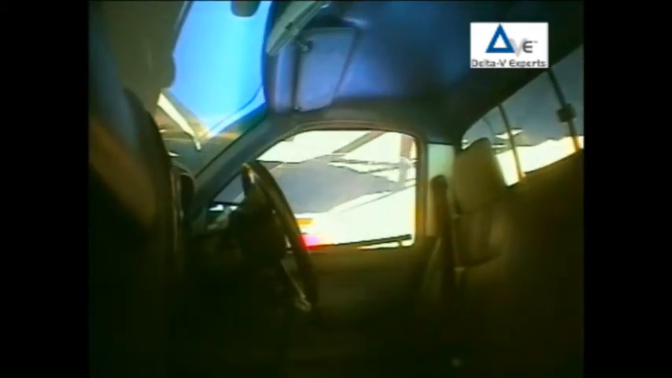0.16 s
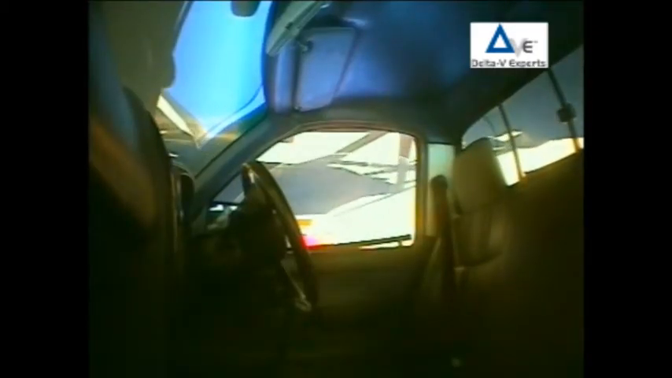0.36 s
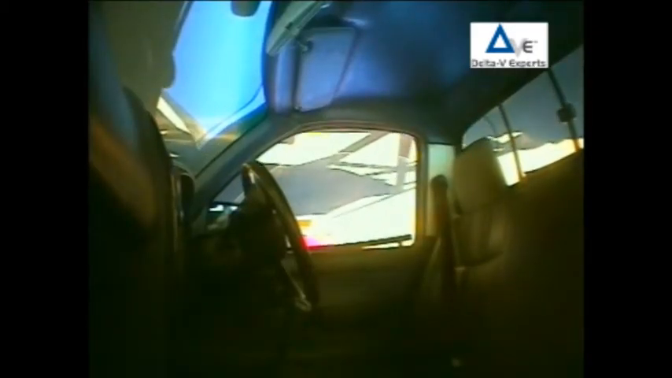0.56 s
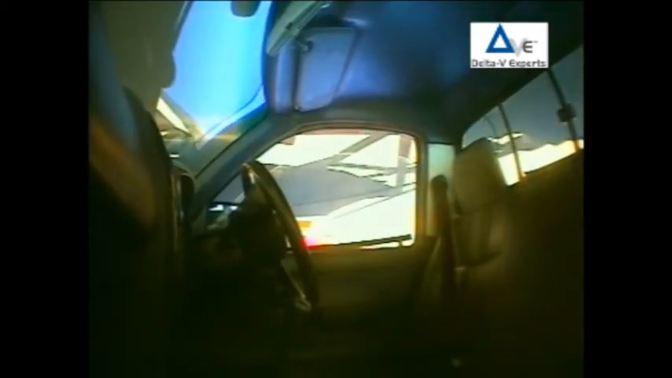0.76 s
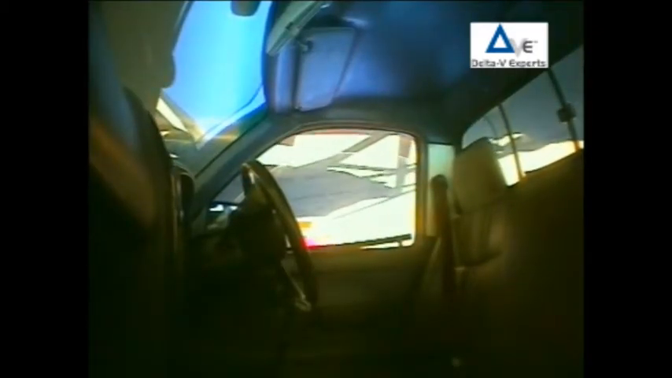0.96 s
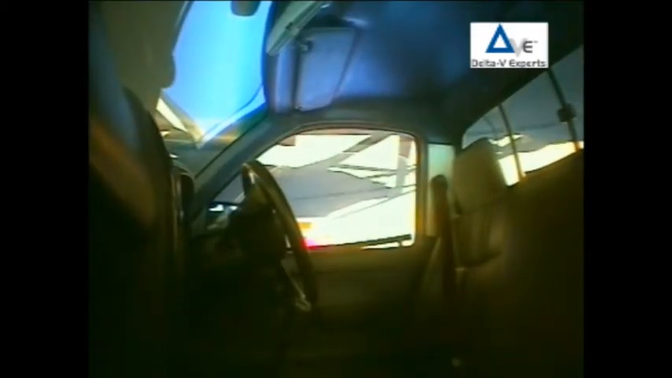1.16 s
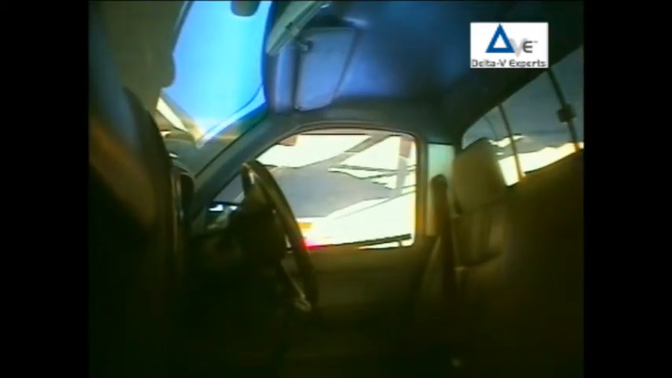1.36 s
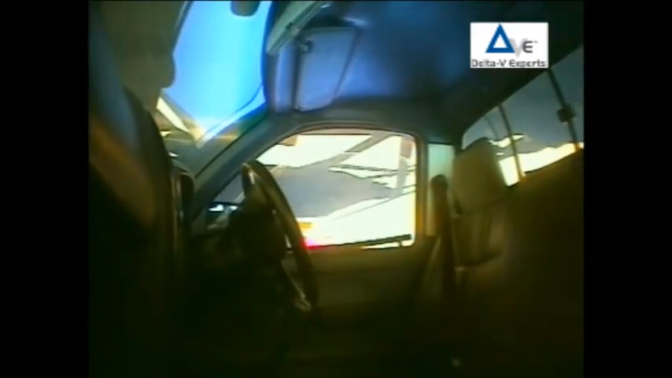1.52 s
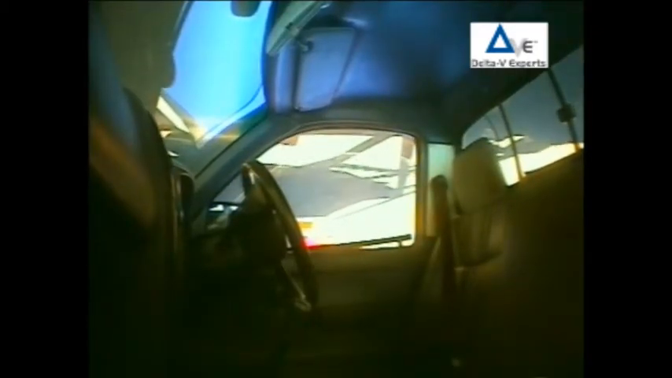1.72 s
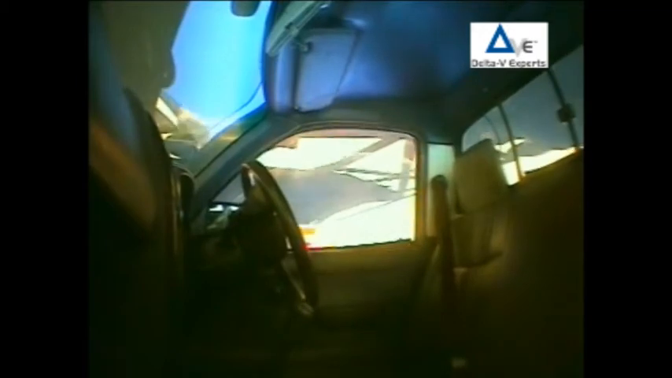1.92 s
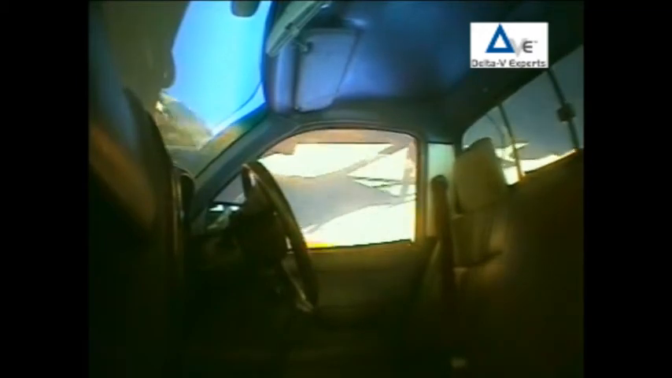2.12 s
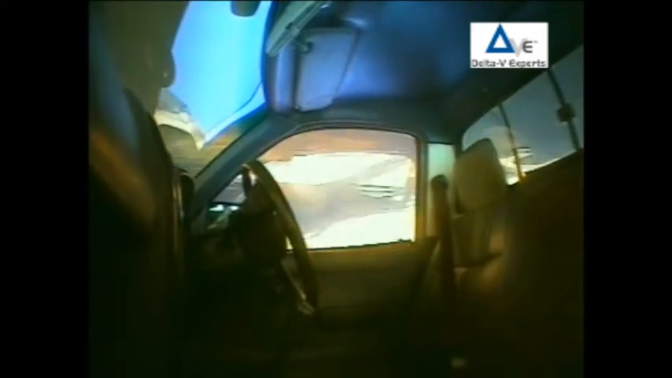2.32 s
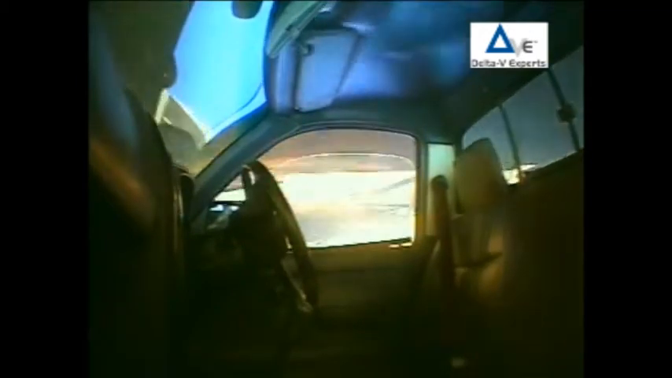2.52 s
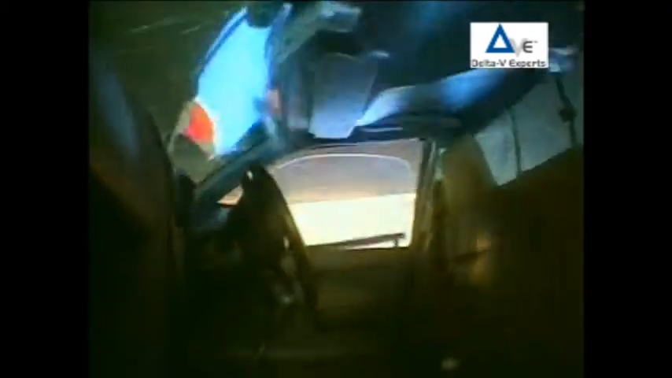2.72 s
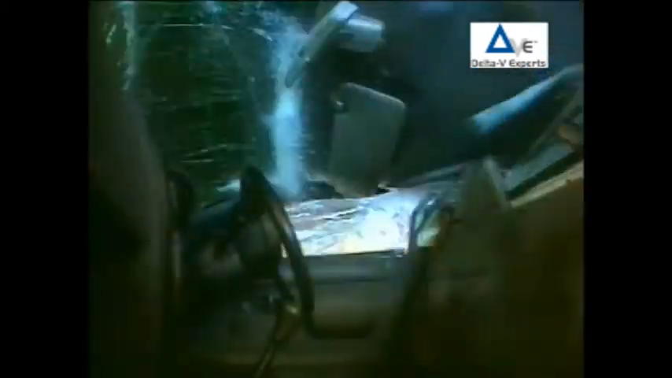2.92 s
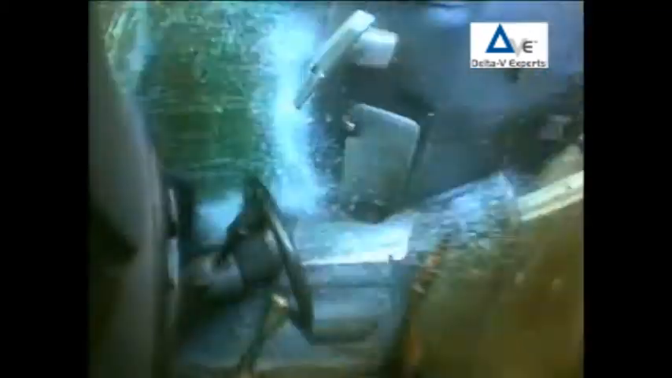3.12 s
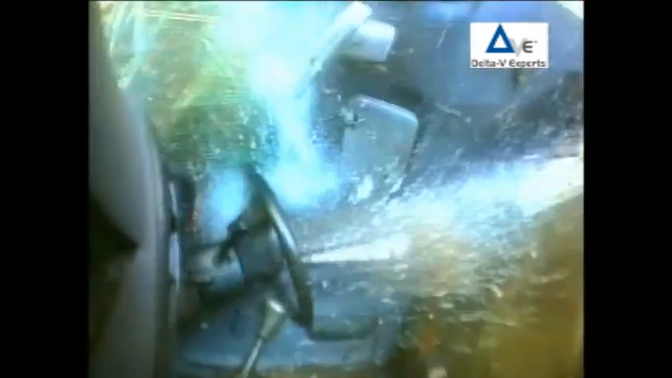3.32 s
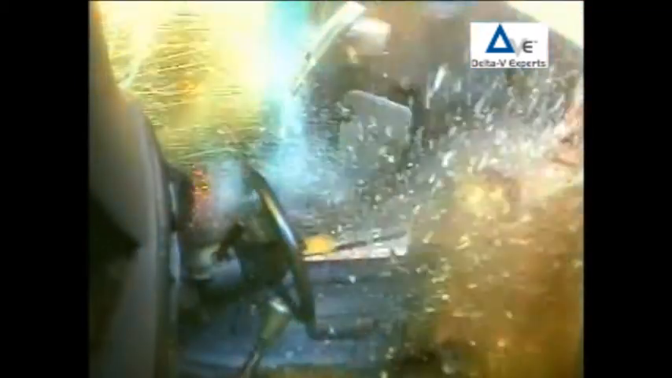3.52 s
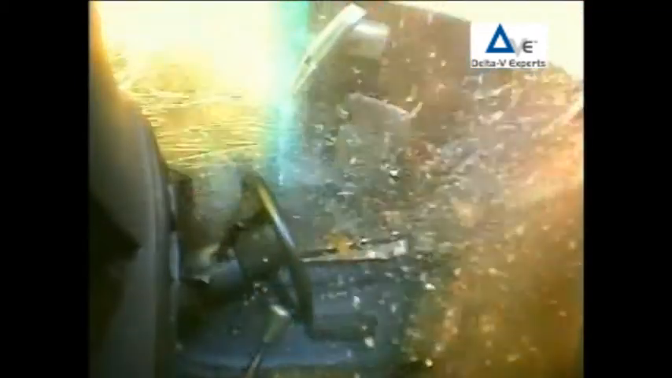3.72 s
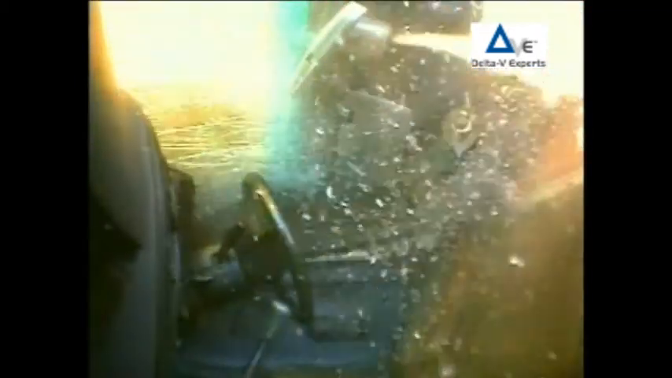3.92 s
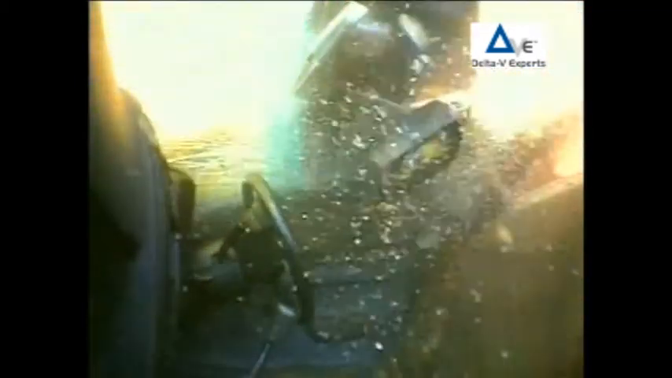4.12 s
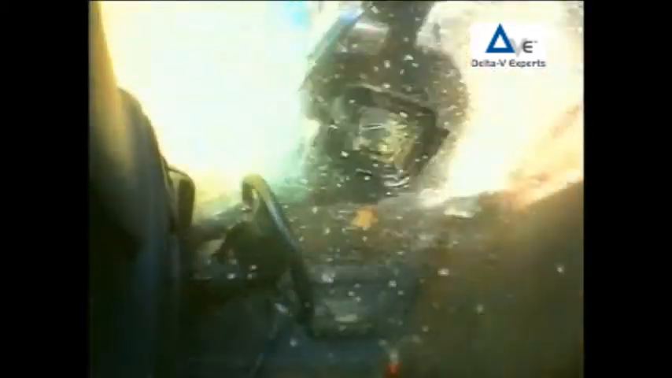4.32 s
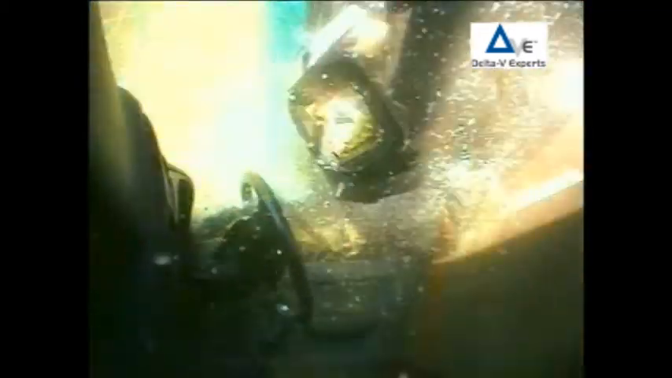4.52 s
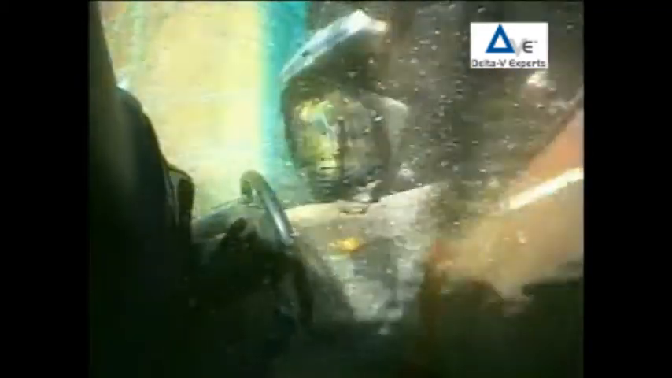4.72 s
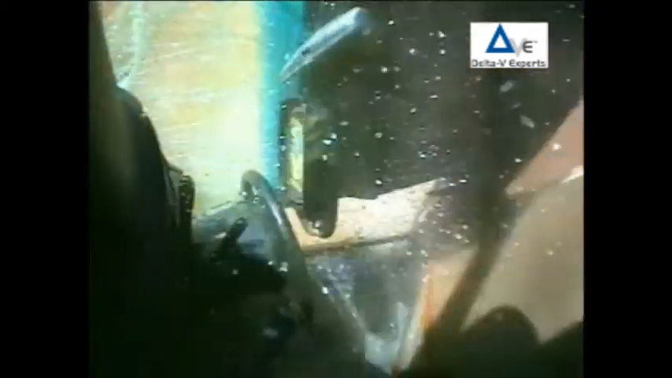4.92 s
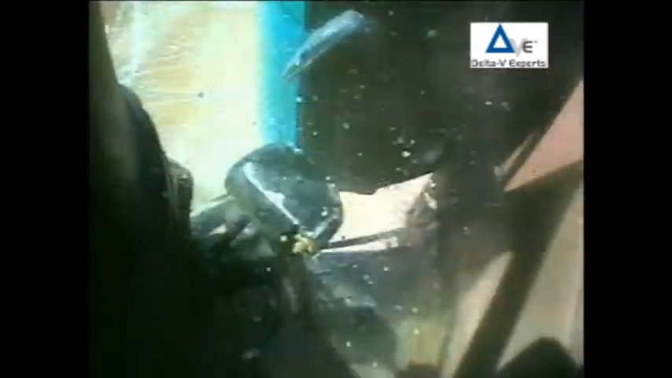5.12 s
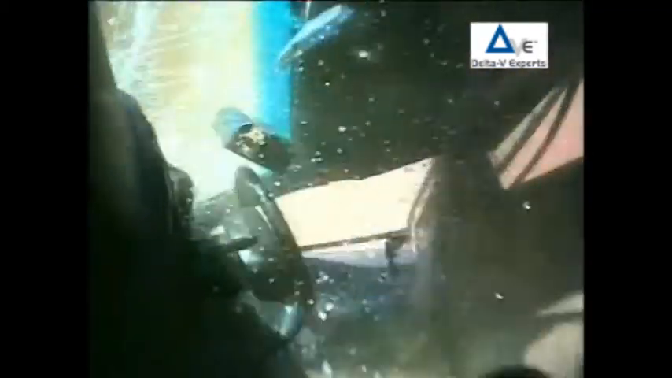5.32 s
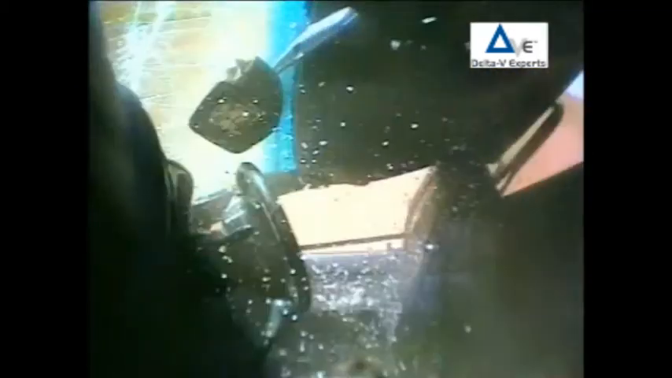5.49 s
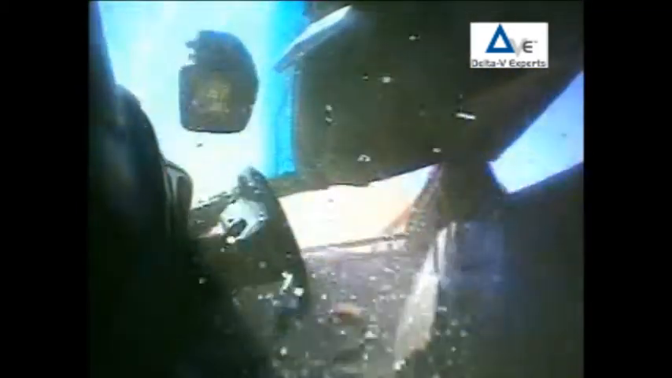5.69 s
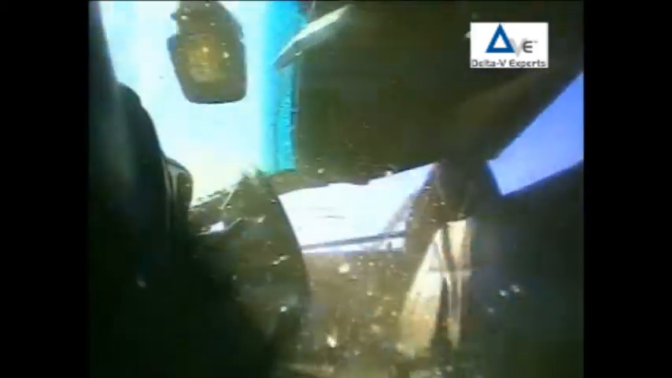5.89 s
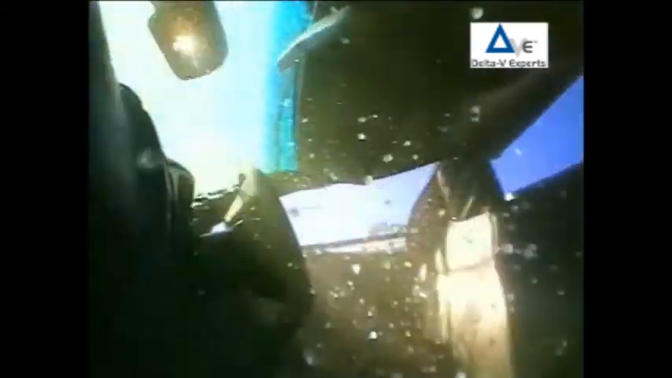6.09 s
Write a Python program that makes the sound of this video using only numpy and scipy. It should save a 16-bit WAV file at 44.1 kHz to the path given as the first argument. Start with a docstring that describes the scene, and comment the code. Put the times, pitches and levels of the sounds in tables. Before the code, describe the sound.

From inside a truck cab there is only faint hum, hiss and a soft electrical buzz pulsing on the right. A low shudder marks the release, a brief lull follows, then heavy blows, crumpling metal and breaking glass roar through two overlapping roof crushes. Panels groan and squeal. The rolling shell rumbles on, debris clatters, and a few dull knocks end it. The cheap, muffled microphone sits on the left.

```python
"""A pickup truck drops onto its roof and rolls, heard dull and deep from inside the cab.
Random snaps through dull, resonant panels make the two roof crushes, breaking glass and rumbling shell.
A shudder as the rig lets go, blows, knocks, squeals and debris join in over a faint hum, rumble and hiss.
The microphone feeds the left side of an 8-bit recorder; the idle right side carries little but hiss,
whine and a pulsing electrical buzz."""
import sys
import numpy as np
from scipy import signal
from scipy.fft import rfft, irfft, next_fast_len
from scipy.io import wavfile
from scipy.ndimage import uniform_filter1d

SR = 44100
rng = np.random.default_rng(int(sys.argv[2]) if len(sys.argv) > 2 else 0)


def wav_record(signal):
    """Record a signal, one row per channel, as 16-bit PCM in the file named by sys.argv[1]."""
    frames = np.transpose(np.atleast_2d(signal))
    bounded = np.clip(frames, -1, 1)
    # unit amplitude maps onto the largest positive 16-bit level
    quanta = np.round(bounded * 32767).astype(np.int16)
    wavfile.write(sys.argv[1], SR, quanta)


N = 271207

# Levels of the truck's sounds are relative: CAB_GAIN_DB is added to their sum.
# Soft cab rumble as the rig starts to roll. Each row: time in seconds, level in dB.
RIG_RUMBLE_LEVELS = [(0, -63.5), (.95, -59.5), (1.08, -55), (1.4, -55), (2.2, -55.5)]
# The hum sinks once the rig rolls. Each row: time in seconds, change in dB.
HUM_FADE = [(1.0, 0), (1.12, -5)]
# Steady whine on the idle side. Each row: multiple of WHINE_HZ, peak in dB.
WHINE_PARTIALS = [(1, -81), (2, -96), (3, -90.5), (4, -96), (5, -96)]
# Spells of pulsing buzz on the idle side. Each row: first burst in seconds, end in seconds.
BUZZ_SPELLS = [(0.128, 1.28), (1.789, 5.24), (5.934, 6.06)]
# Spectrum of the shudder. Each row: frequency in Hz, relative density in dB per Hz.
SHUDDER_SPECTRUM = [(13, -31.5), (22, -2.5), (44, -0.5), (103, -8.5), (136, -3.5), (249, -20), (280, -29.5),
                    (360, -24.5), (404, -37), (432, -32.5), (1200, -50.5), (1560, -65), (2640, -120)]
# Spectrum of snaps heard through the cab. Each row: frequency in Hz, relative density in dB per Hz.
CAB_SPECTRUM = [(13, -38.5), (22, -6), (43, -3), (135, -0.5), (225, -6.5), (273, -9.5), (352, -7),
                (551, -4), (626, -8.5), (697, -7), (959, -15.5), (1110, -13.5), (1500, -20.5),
                (2070, -27.5), (3600, -51), (4680, -75.5), (7920, -120)]
# Panel resonances. Each row: frequency in Hz, width in Hz, relative gain in dB.
PANEL_RESONANCES = [(128.8, 27, -3), (153.8, 22, -3.5), (221.4, 29, -6), (401.6, 31, -12), (583, 50, -3.5),
                    (700, 50, -10), (893, 60, -4.5), (1093, 80, -9.5), (1798, 70, -8.5), (2232, 48, -4)]
# Showers of debris and loose trim on the panels.
# Each row: peak in seconds, rise in seconds, fall in seconds, metal in dB, glass in dB.
DEBRIS_SHOWERS = [(1.44, 0.016, 0.036, -58, -71), (4.825, 0.057, 0.029, -36.5, -52.5),
                  (4.931, 0.034, .027, -36.5, -43), (5.053, 0.04, 0.053, -41.5, -45.5),
                  (5.183, 0.022, 0.04, -46, -57), (5.461, 0.019, 0.035, -56.5, -70),
                  (5.896, 0.024, 0.067, -47, -67.5)]
# Snapping panes. Each row: time in seconds, click height in dB before its band-pass.
GLASS_CRACKS = [(3.543, -22), (3.811, -28), (3.835, -21)]
# Bounces of the shell and loose parts. Each row: start in seconds, pitch in Hz, swell peak in dB.
BOUNCES = [(1.433, 129.3, -33), (1.484, 49.8, -37), (1.486, 138, -36), (1.528, 185.5, -41),
           (1.555, 60.3, -39), (1.634, 46, -42.5), (1.685, 108.4, -45.5), (2.576, 55.4, -34),
           (2.704, 146.6, -24.5), (2.85, 99, -26.5), (3.06, 46, -23.5), (3.243, 149, -28),
           (3.525, 214, -22.5), (3.679, 88, -22.5), (3.781, 210.4, -21.5), (3.873, 151, -27.5),
           (4.047, 220, -25.5), (4.108, 130, -31), (4.327, 214, -25.5), (4.468, 116.6, -23),
           (4.751, 235, -27), (4.806, 233, -33), (4.849, 288, -35), (4.985, 75.5, -32.5),
           (5.04, 182.5, -35.5), (5.153, 173, -27), (5.188, 48, -30.5), (5.271, 119.5, -30.5),
           (5.276, 52.5, -31), (5.435, 101.8, -31), (5.445, 351, -46), (5.534, 75.8, -33),
           (5.61, 120.3, -30), (5.868, 315.5, -46), (5.886, 102, -30.5), (5.92, 376, -48)]
# Blows on the shell. Each row: start in seconds, relative strength in dB, contact in seconds.
SHELL_BLOWS = [(1.419, -37, 0.0022), (1.434, -25, 0.0037), (1.45, -30, 0.0041), (1.47, -38.5, .0018),
               (1.485, -29, 0.0075), (2.224, -28.5, .0047), (2.245, -17, 0.0024), (2.257, -21, 0.0015),
               (2.264, -19, 0.0015), (2.449, -22, .0013), (2.466, -22, 0.0015), (2.485, -18, 0.0014),
               (2.524, -19, 0.0018), (2.668, -16.5, 0.0014), (2.674, -17, 0.0024), (2.698, -22, 0.0055),
               (2.732, -17.5, 0.0021), (2.799, -23.5, 0.0014), (2.826, -17.5, 0.0031),
               (2.837, -18.5, 0.0021), (2.861, -12, 0.0022), (2.881, -22, .003), (2.911, -17, .002),
               (2.926, -23.5, 0.0018), (3.26, -23, 0.0029), (3.378, -19.5, 0.0011), (3.491, -13, 0.0015),
               (3.52, -17, .0021), (3.543, -12, 0.0016), (3.633, -19, 0.0014), (3.643, -13.5, .0023),
               (3.703, -12.5, 0.0089), (3.738, -17.5, 0.0017), (3.769, -17.5, 0.0026), (3.781, -11, 0.0023),
               (3.797, -18, .0026), (3.809, -11, .0024), (3.816, -19, 0.0017), (3.834, -15, 0.0017),
               (3.859, -17.5, 0.0024), (3.88, -16.5, 0.0013), (3.893, -10.5, 0.0027), (4.11, -20.5, 0.0014),
               (4.122, -17, .0017), (4.339, -23, 0.0023), (4.398, -18, 0.0032), (4.432, -18, 0.0017),
               (4.448, -15.5, 0.0019), (4.475, -19, 0.0035), (4.483, -6.5, 0.0031), (4.57, -13, 0.0043),
               (4.59, -10, 0.0024), (4.617, -24.5, 0.00097), (4.642, -13, 0.0071), (4.654, -16, 0.0041),
               (4.693, -13.5, 0.0042), (4.757, -13.5, .005), (4.784, -22.5, 0.0045), (4.814, -16, 0.0022),
               (4.844, -19.5, 0.0021), (4.896, -24.5, 0.0015), (4.908, -17, .0045), (4.918, -22, .0018),
               (4.926, -27.5, 0.00091), (5.029, -26, 0.0016), (5.051, -27, 0.0011), (5.064, -25, 0.0016),
               (5.166, -31, 0.0045), (5.184, -29.5, 0.0039), (5.868, -34.5, .002), (5.889, -29.5, 0.0032),
               (5.938, -34.5, 0.003), (5.976, -42, 0.0014)]
# Cab modes rung by a blow. Each row: frequency in Hz, gain in dB, 60 dB decay in seconds.
CAB_MODES = [(39.6, -23, .2), (51.9, -22, 0.21), (86.6, -23, 0.13), (128.6, -14, 0.093),
             (158.3, -15.5, 0.12), (216.2, -11, 0.054), (367, -18, 0.035), (556, -14.5, 0.031)]
# Groaning panels and squealing panes.
# Each row: start in seconds, length in seconds, pitch in Hz, width in Hz, level in dB.
SQUEALS = [(2.253, 0.033, 810, 89, -25), (2.437, 0.12, 514, 91, -25.5), (2.549, 0.087, 903, 79.6, -31),
           (2.791, 0.056, 563, 70, -26), (3.318, 0.41, 1160, 188, -35), (3.438, 0.097, 2060, 75, -42.5),
           (3.475, 0.13, 2200, 120, -46), (3.497, 0.026, 560, 59.4, -29), (3.542, 0.034, 2180, 60, -48),
           (3.621, 0.04, 545, 68.4, -24.5), (3.755, 0.058, 420, 60.5, -25), (3.804, 0.061, 700, 61, -24),
           (3.828, 0.018, 830, 81, -26), (3.92, 0.054, 864, 60, -36), (3.946, 0.14, 710, 48.8, -34.5),
           (4.064, 0.096, 581, 59, -27), (4.092, 0.055, 1087, 120, -31), (4.206, 0.045, 1330, 219, -37),
           (4.447, 0.045, 876, 82, -32), (4.573, 0.037, 435, 118, -29)]
# Rumble of the tumbling shell. Each row: time in seconds, level in dB.
SHELL_RUMBLE = [(2.21, -56), (2.25, -33), (2.31, -38), (2.5, -31.5), (2.63, -35), (2.67, -28), (3.0, -33),
                (3.21, -36.5), (3.33, -36.5), (3.55, -28.5), (3.85, -29.5), (4.32, -32.5), (4.49, -24),
                (4.53, -33), (4.66, -28.5), (4.72, -30.5), (4.85, -27), (4.88, -33), (4.92, -25),
                (4.95, -35.5), (5.3, -35), (5.39, -50), (5.45, -40), (5.85, -45.5), (5.89, -38),
                (6.14, -51.5)]
# The two spells in which the roof gives way. Each row: time in seconds, steel in dB, glass in dB.
ROOF_CRUSHES = [
    [(2.228, -48, -72), (2.254, -39.5, -63), (2.26, -23.5, -43), (2.274, -26, -37), (2.308, -31.5, -41),
     (2.36, -25, -37), (2.532, -24.5, -30), (2.642, -32, -39), (2.664, -29.5, -38.5), (2.766, -27.5, -38.5),
     (2.786, -35, -40.5), (2.808, -32.5, -38.5), (2.884, -29, -42.5), (3.228, -36.5, -50.5),
     (3.24, -30.5, -49)],
    [(3.25, -36.5, -48.5), (3.33, -28.5, -45.5), (3.372, -27.5, -37), (3.52, -21, -35), (3.618, -24, -35.5),
     (3.638, -18.5, -34), (3.664, -25, -42), (3.824, -22, -33), (4.032, -24.5, -34), (4.126, -29, -32.5),
     (4.188, -26.5, -36.5), (4.228, -28.5, -35), (4.256, -31.5, -39.5), (4.358, -31, -42.5),
     (4.482, -26.5, -39), (4.532, -29.5, -44.5), (4.586, -27.5, -44), (4.684, -32, -46),
     (4.748, -46.5, -55.5), (4.77, -44, -46.5)],
]

# cab floor
HUM_HZ, HUM_PEAK_DB = 96.8, -54.5   # before fade and wavering
LINE_HISS_DB = -67.5
# idle side; a burst has fallen to 1/e at BUZZ_HALF_S from its centre
WHINE_HZ = 1500
WHISTLE_START_S, WHISTLE_HZ, WHISTLE_DB = 2.6, 917, -86
BUZZ_PERIOD_S, BUZZ_HZ, BUZZ_DB, BUZZ_HALF_S = 0.2555, 88, -53, 0.018
HANG_DB, HANG_S = -59, 0.034
# shudder of the released truck
RELEASE_S, SHUDDER_DB, SHUDDER_ATTACK_S, SHUDDER_DECAY_DB_PER_S = 1.421, -35, 0.0078, 45.5
# upper band edges
SWAY_TOP_HZ, BOOM_TOP_HZ, DRUM_TOP_HZ, METAL_TOP_HZ, GLASS_TOP_HZ = 70.2, 150, 279, 1026, 3567
# debris and glass; tinkle levels are relative to the glass of the shower or crush
SHOWER_EDGE = 2.2   # steepness of start and end
PIECES_PER_S, PIECES_SPREAD_DB = 420, 2
TINKLE_LOW_HZ, TINKLE_TOP_HZ, TINKLE_DB = 1860, 2840, -17.5
SPLINTER_LOW_HZ, SPLINTER_TOP_HZ, SPLINTER_DB = 2094, 3470, -24
CRACK_LOW_HZ, CRACK_TOP_HZ = 1900, 5100
# knocks and blows; crunch levels are relative to a blow with the stated contact
KNOCK_SWELL_S = 0.016
CRUNCH_CONTACT_S, CRUNCH_DULL_DB, CRUNCH_BRIGHT_DB, CRUNCH_DECAY_S = 0.0015, -10.5, -14.5, 0.0039
# panels as they bend: shift as a share of pitch, depth of the patchy level, pace
PANEL_BEND, PANEL_PATCHY_DB, PANEL_PACE_HZ = 0.025, 2, 7
# rumble: trim, depth and pace of the lurch; sway and rattle are relative to it
RUMBLE_TRIM_DB, LURCH_DB, LURCH_HZ = 0.7, 0.36, 7.2
LANDING_S, SWAY_DB, SWAY_GROWTH_DB_PER_S, SWAY_MAX_DB = 2.4, -11.5, 4, -1
RATTLE_DB = -20.5   # loose trim, before METAL_DB
METAL_DB = -2.5     # trim of crumpling steel and rattle
# mix and recorder
CAB_GAIN_DB, LEAK_DB = 5.0, -60.0
STEP, CUTOFF_HZ, OUTPUT_HISS_DB = 1 / 128, 15300, -67.5


def from_db(db):
    """Decibels to gain."""
    return 10 ** (np.asarray(db) / 20)


def seconds():
    """The time of every sample."""
    return np.arange(N) / SR


def curve(rows):
    """Straight lines through (seconds, value) rows."""
    return np.interp(seconds(), *np.transpose(rows))


def rms_one(x):
    """Scale to rms 1."""
    return x / np.sqrt(np.mean(x ** 2) + 1e-20)


def gains(rows):
    """One gain curve per dB column, near silent outside the rows, smoothed over 200 samples."""
    t = seconds()
    times, *columns = np.transpose(rows)
    sounding = (t >= times[0]) & (t <= times[-1])
    return [uniform_filter1d(sounding * from_db(np.interp(t, times, db)), size=200) + 1e-9
            for db in columns]


def passed(x, hz, kind, order=2):
    """Causal Butterworth filter."""
    sos = signal.butter(order, hz, kind, fs=SR, output="sos")
    return signal.sosfilt(sos, x + 1e-18)


def drift(hz):
    """Low-passed noise of rms 1, taken after a second of run-in."""
    return rms_one(passed(rng.standard_normal(N + SR), hz, "low")[SR:])


def coloured(x, spectrum):
    """Minimum-phase filter through (Hz, dB) points, so that nothing sounds before its cause."""
    size = next_fast_len(N + SR // 2) * 2
    hz, db = np.transpose(spectrum)
    bins_hz = np.arange(size // 2 + 1) * SR / size
    level_db = np.interp(np.log(bins_hz + 1e-9), np.log(hz), db)
    # fold the cepstrum onto positive time
    cepstrum = irfft(np.log(from_db(level_db)))
    cepstrum[1:size // 2] *= 2
    cepstrum[size // 2 + 1:] = 0
    return irfft(rfft(x, size) * np.exp(rfft(cepstrum)))[:N]


def resonance(x, hz, width_hz):
    """Two-pole band-pass with gain 1 on top."""
    r = np.exp(-np.pi * width_hz / SR)
    numerator = np.array([1, 0, -1]) * (1 - r * r) / 2
    return signal.lfilter(numerator, [1, -2 * r * np.cos(2 * np.pi * hz / SR), r * r], x)


def ring(x, hz, t60_s):
    """A unit click sets a decaying sine of height 1 ringing."""
    r = from_db(-60 / (t60_s * SR))
    w = 2 * np.pi * hz / SR
    return signal.lfilter([0, np.sin(w)], [1, -2 * r * np.cos(w), r * r], x + 1e-18)


def snaps(per_s, spread_db):
    """Snaps at random times, of random sign, their sizes spread exponentially in dB."""
    sizes = from_db(spread_db * np.minimum(rng.exponential(1, N), 4))
    signs = rng.choice([-1, 1], N)
    return sizes * signs * (rng.random(N) < per_s / SR)


def evened(x, span_s):
    """Hold the slow level at rms 1 and keep the grain."""
    size = max(int(span_s * SR), 8)
    power = uniform_filter1d(uniform_filter1d(x * x, size), size)
    return x / np.sqrt(np.abs(power) + 1e-20)


def cab_floor():
    """A low wavering hum, the soft rumble of the rig and hiss on the microphone line."""
    hum_gain = from_db(HUM_PEAK_DB + curve(HUM_FADE) + 1.5 * drift(6))
    hum_hz = HUM_HZ + 0.8 * drift(4.6)
    hum = hum_gain * np.sin(2 * np.pi * np.cumsum(hum_hz) / SR)
    rumble = drift(150) + from_db(-3) * rms_one(resonance(drift(150), 41, 16))
    hiss = from_db(-73) * drift(540) + from_db(LINE_HISS_DB) * rng.standard_normal(N)
    return hum + from_db(curve(RIG_RUMBLE_LEVELS)) * rumble + hiss


def idle_side():
    """Faint hiss, whine and a late whistle, with a short low buzz about four times a second."""
    t = seconds()
    whine = sum(from_db(db) * np.sin(2 * np.pi * k * WHINE_HZ * t) for k, db in WHINE_PARTIALS)
    whistle = rms_one(resonance(rng.standard_normal(N), WHISTLE_HZ, 25))
    whistle *= from_db(WHISTLE_DB) * (t > WHISTLE_START_S)

    bursts = np.concatenate([np.arange(first, end, BUZZ_PERIOD_S) for first, end in BUZZ_SPELLS])
    nearest = np.searchsorted((bursts[1:] + bursts[:-1]) / 2, t)
    age = t - bursts[nearest]   # negative ahead of the burst's centre
    gate = np.exp(-(age / BUZZ_HALF_S) ** 4)
    cycles = np.sin(2 * np.pi * np.cumsum(BUZZ_HZ + 4 * drift(4.6)) / SR)
    buzz = from_db(BUZZ_DB) * gate * (cycles + 0.32)
    # a ramp off the step edge: the line hangs on one recorder step and the step hiss pauses
    hang = from_db(HANG_DB) * (age > 0) * (age < HANG_S) * age / HANG_S

    wander = from_db(-75) * drift(20) + from_db(-75.5) * drift(90) + from_db(-78) * drift(1100)
    hiss = from_db(-75) * rng.standard_normal(N)
    return hiss + wander + whine + whistle + buzz + hang


def release():
    """The freed truck shudders on its springs: a quick rise, then a steady decay."""
    age = np.maximum(seconds() - RELEASE_S, 0)
    rise = np.minimum(age / SHUDDER_ATTACK_S, 1)
    level = rise * from_db(SHUDDER_DB - SHUDDER_DECAY_DB_PER_S * age)
    shake = coloured(snaps(per_s=660, spread_db=2.5), SHUDDER_SPECTRUM)
    return level * evened(shake, span_s=0.03)


def knocks():
    """A soft contact builds up one low mode, which soon dies away."""
    out = np.zeros(N)
    for start_s, hz, db in BOUNCES:
        start = int(start_s * SR)
        age = np.arange(min(SR // 4, N - start)) / SR
        x = age / KNOCK_SWELL_S
        swell = x * np.exp(0.5 - 0.5 * x ** 2)   # peaks at 1
        out[start:start + len(age)] += from_db(db) * swell * np.sin(2 * np.pi * hz * age)
    return out


def through_panels(clicks):
    """Snaps reach the cab through its dull, resonant panels."""
    x = coloured(clicks, CAB_SPECTRUM)
    return x + sum(from_db(db) * resonance(x, hz, width) for hz, width, db in PANEL_RESONANCES)


def shower_gains():
    """Each shower sets in quickly and dies; returns the metal and glass gains."""
    t = seconds()
    swells = np.array([np.exp(-np.maximum((peak - t) / rise, (t - peak) / fall) ** SHOWER_EDGE)
                       for peak, rise, fall, _, _ in DEBRIS_SHOWERS])
    return from_db(np.array(DEBRIS_SHOWERS)[:, 3:]).T @ swells


def debris():
    """Separate pieces clatter on the panels, each with a dull knock and a bright edge."""
    metal, glass = shower_gains()
    pieces = through_panels(snaps(PIECES_PER_S, PIECES_SPREAD_DB))
    dull = passed(pieces, [DRUM_TOP_HZ, METAL_TOP_HZ], "band", order=3)
    bright = passed(pieces, [METAL_TOP_HZ, GLASS_TOP_HZ], "band", order=4)
    return metal * evened(dull, span_s=0.025) + glass * evened(bright, span_s=0.025)


def tinkle():
    """Sparse bright grains: splinters while the roof is crushed, loose shards in each shower."""
    splinters = passed(snaps(per_s=550, spread_db=3.5), [SPLINTER_LOW_HZ, SPLINTER_TOP_HZ], "band", order=3)
    shards = passed(snaps(per_s=670, spread_db=-3.5), [TINKLE_LOW_HZ, TINKLE_TOP_HZ], "band", order=3)
    _, crush_glass = gains(np.concatenate(ROOF_CRUSHES))
    _, shower_glass = shower_gains()
    return (from_db(SPLINTER_DB) * crush_glass * evened(splinters, span_s=0.048)
            + from_db(TINKLE_DB) * shower_glass * evened(shards, span_s=0.04))


def cracks():
    """Single bright ticks of snapping glass: band-passed clicks."""
    clicks = np.zeros(N)
    for s, db in GLASS_CRACKS:
        clicks[int(s * SR)] = from_db(db)
    return passed(clicks, [CRACK_LOW_HZ, CRACK_TOP_HZ], "band")


def scrape():
    """Quick slips excite one resonance in each groan or squeal, in a single swell."""
    slips = snaps(per_s=2100, spread_db=0.0)
    out = np.zeros(N)
    run_in = SR // 10
    for start_s, length_s, hz, width, db in SQUEALS:
        start, size = int(start_s * SR), int(length_s * SR)
        excitation = slips[start - run_in:start + size + run_in]
        rung = resonance(resonance(excitation, hz, width), hz, 3 * width)
        tone = evened(rung, span_s=0.012)[run_in:run_in + size]
        swell = np.sin(np.linspace(0, np.pi, size))
        out[start:start + size] += from_db(db) * swell * tone
    return out


def blows():
    """Each blow pushes the cab air, crunches and rings the shell; short contacts crunch brighter."""
    push, impulse, dull, bright = np.zeros((4, N))
    for start_s, db, contact_s in SHELL_BLOWS:
        pulse = np.hanning(max(int(contact_s * SR), 4))
        start = int(start_s * SR)
        at = slice(start, start + len(pulse))
        push[at] += from_db(db) * pulse
        impulse[at] += from_db(db) * pulse / pulse.sum()
        dull[start] += from_db(db) * (CRUNCH_CONTACT_S / contact_s) ** 1.9
        bright[start] += from_db(db) * (CRUNCH_CONTACT_S / contact_s) ** 2.5
    rings = sum(from_db(db) * ring(impulse, hz, t60) for hz, db, t60 in CAB_MODES)

    # each crunch click becomes an exponential decay of grit
    pole = np.exp(-1 / (CRUNCH_DECAY_S * SR))
    dull, bright = signal.lfilter([1], [1, -pole], np.array([dull, bright]) + 1e-18)
    grit = through_panels(rng.standard_normal(N))
    dull_grit = evened(passed(grit, [320, 850], "band", order=3), span_s=0.0038)
    bright_grit = evened(passed(grit, [850, 1900], "band", order=3), span_s=0.021)
    crunch = from_db(CRUNCH_DULL_DB) * dull * dull_grit + from_db(CRUNCH_BRIGHT_DB) * bright * bright_grit
    crunch = passed(crunch, 2100, "low", order=6)
    return passed(from_db(-1.0) * push + rings + crunch, 34, "high")


def bending(x):
    """A ringing panel wavers in pitch and strength as it is bent."""
    at = np.arange(N)
    pole = np.exp(-PANEL_PACE_HZ / SR)
    lead = signal.lfilter([1], [1, -pole], PANEL_BEND * drift(PANEL_PACE_HZ))   # time shift in samples
    return np.interp(at + lead, at, x) * from_db(PANEL_PATCHY_DB * drift(PANEL_PACE_HZ) - 2.0)


def through_bending_panels(clicks):
    """The panel path while the panels are folding, so that their resonances wander."""
    x = coloured(clicks, CAB_SPECTRUM)
    panels = sum(from_db(db) * bending(resonance(x, hz, width)) for hz, width, db in PANEL_RESONANCES)
    return x + from_db(6.5) * panels


def crash_levels():
    """Gains of sway, boom, metal and glass: rumble drives the low sounds, the crush the high ones."""
    rumble, = gains(SHELL_RUMBLE)
    boom = from_db(RUMBLE_TRIM_DB + LURCH_DB * drift(LURCH_HZ)) * rumble
    # the deep sway builds up as the truck rolls
    sway_db = SWAY_DB + SWAY_GROWTH_DB_PER_S * (seconds() - LANDING_S)
    sway = boom * from_db(np.minimum(sway_db, SWAY_MAX_DB))
    steel, glass = gains(np.concatenate(ROOF_CRUSHES))
    metal = np.hypot(steel, from_db(RATTLE_DB) * boom)
    return sway, boom, metal, glass


def crash():
    """Buckling steel snaps and sways the shell; glass breaks in finer, denser grains."""
    sway, boom, metal, glass = crash_levels()
    buckles = through_bending_panels(snaps(per_s=1500, spread_db=1.5))
    shards = through_panels(snaps(per_s=3000, spread_db=2.0))
    jolts = through_panels(snaps(per_s=600, spread_db=2.5))

    swaying = evened(passed(buckles, [29, SWAY_TOP_HZ], "band", order=3), span_s=0.061)
    dull = evened(passed(jolts, [SWAY_TOP_HZ, BOOM_TOP_HZ], "band"), span_s=0.037)
    hard = evened(passed(buckles, [SWAY_TOP_HZ, DRUM_TOP_HZ], "band", order=4), span_s=0.037)
    crumpling = evened(passed(buckles, [DRUM_TOP_HZ, METAL_TOP_HZ], "band", order=4), span_s=0.02)
    grains = buckles + 0.88 * shards
    breaking = evened(passed(grains, [METAL_TOP_HZ, GLASS_TOP_HZ], "band", order=4), span_s=0.025)

    # the cab drums hard while steel gives way, dully afterwards
    yielding = metal ** 2 / (metal ** 2 + (from_db(-13.5) * boom) ** 2)
    booming = from_db(0.5) * np.sqrt(yielding) * hard + from_db(-4.5) * np.sqrt(1 - yielding) * dull
    return sway * swaying + boom * booming + from_db(METAL_DB) * metal * crumpling + glass * breaking


def scene():
    """Cab microphone on the left; a trace of the truck leaks into the idle line on the right."""
    truck = release() + knocks() + debris() + tinkle() + cracks() + scrape() + blows() + crash()
    truck = from_db(CAB_GAIN_DB) * truck
    leak = from_db(LEAK_DB) * passed(truck, 300, "high")
    return np.array([truck + cab_floor(), idle_side() + leak])


def record(dry):
    """Eight-bit steps turn faint signals into square waves and hiss; the top is cut."""
    stepped = STEP * (np.floor(dry / STEP) + 0.5)
    stepped = stepped + from_db(OUTPUT_HISS_DB) * rng.standard_normal(dry.shape)
    top_cut = signal.ellip(10, 0.1, 80, CUTOFF_HZ, fs=SR, output="sos")
    return signal.sosfilt(top_cut, stepped) - STEP / 2


dry = scene()
out = record(dry)
wav_record(out)
```